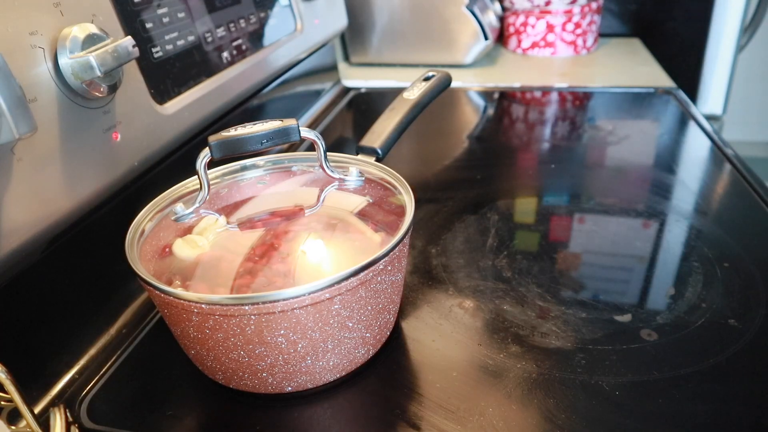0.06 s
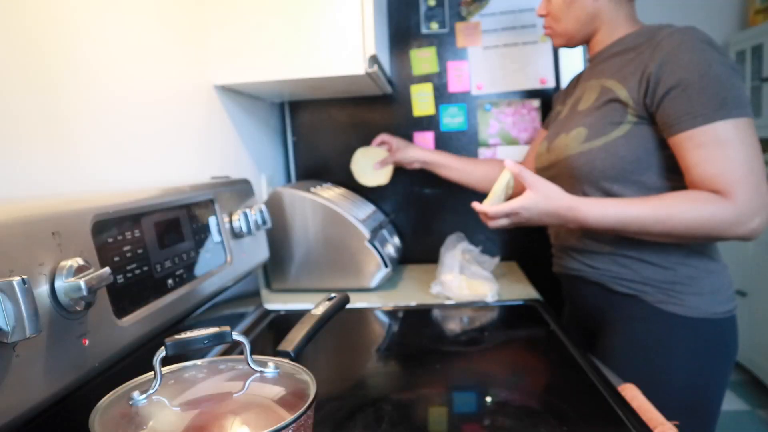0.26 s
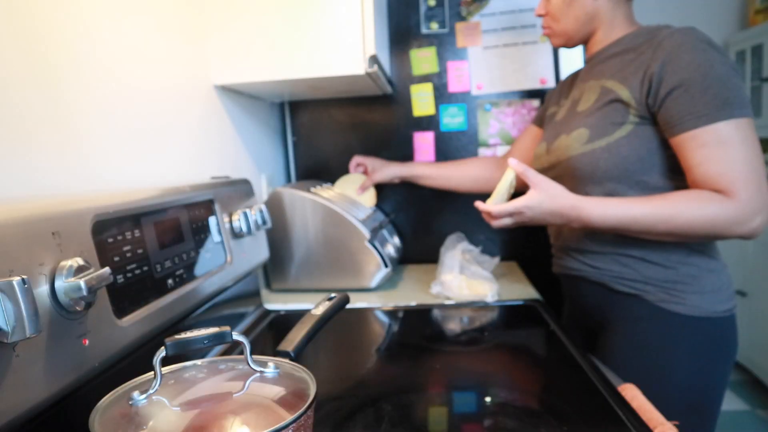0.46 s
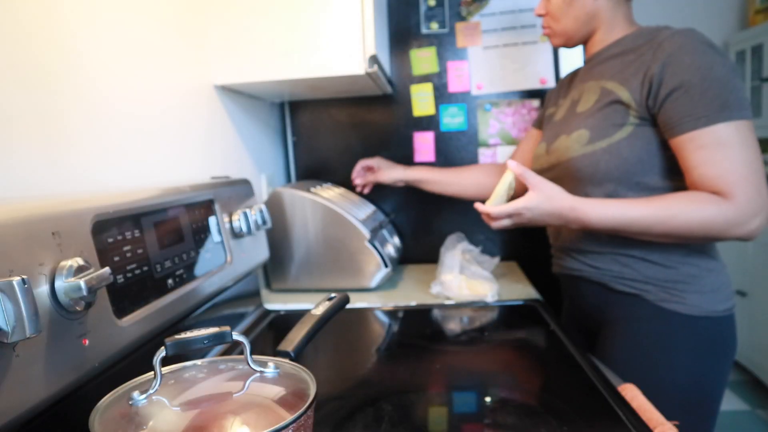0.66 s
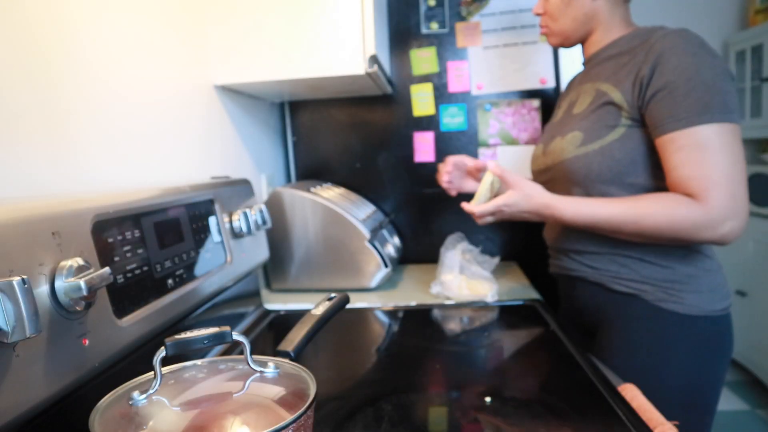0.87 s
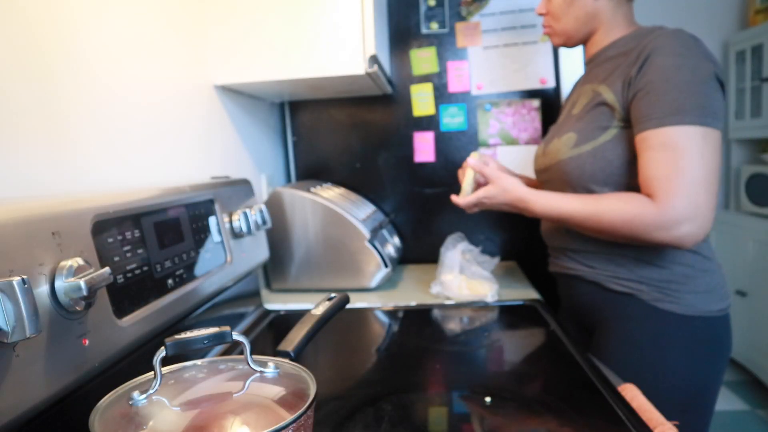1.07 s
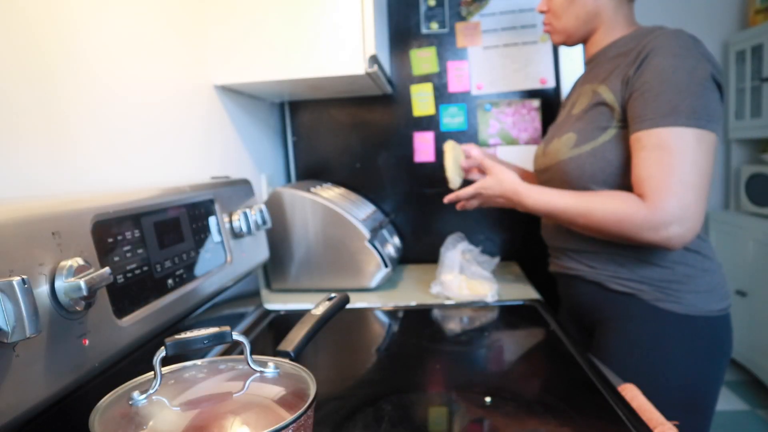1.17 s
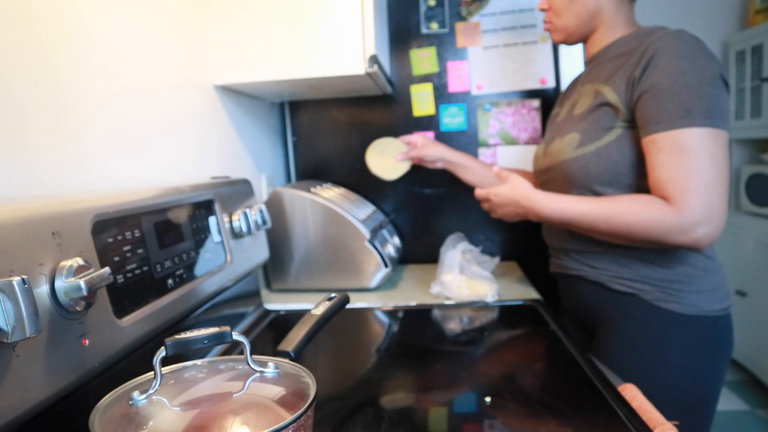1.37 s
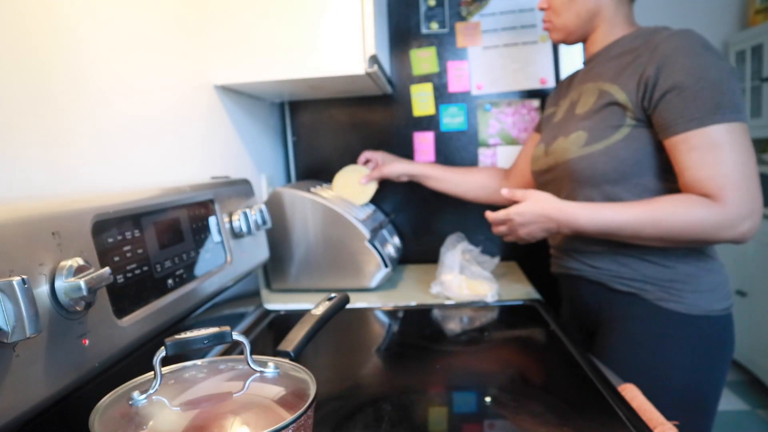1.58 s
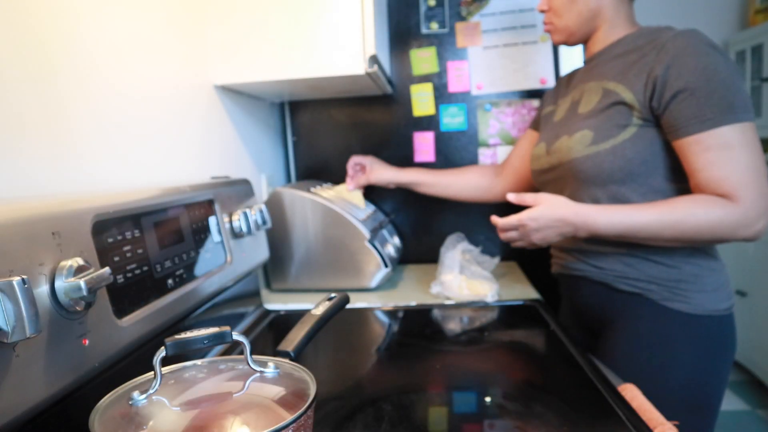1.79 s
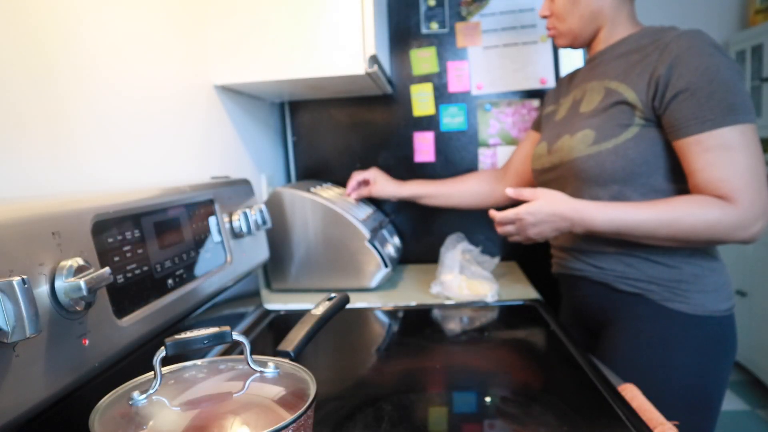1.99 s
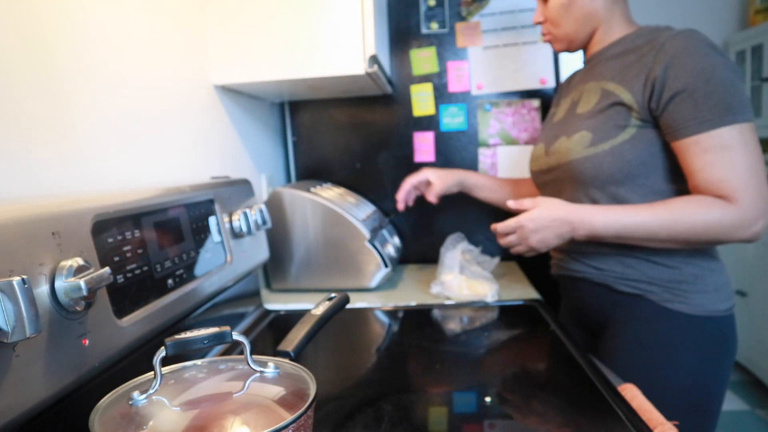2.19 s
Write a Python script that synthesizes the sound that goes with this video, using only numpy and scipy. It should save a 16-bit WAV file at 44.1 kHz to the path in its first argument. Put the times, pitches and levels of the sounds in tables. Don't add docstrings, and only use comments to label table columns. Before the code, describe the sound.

Dry crust scrapes a toaster slot and bumps its thin shell, a pause with tiny ticks follows, then a second scrape ends in a hard metallic knock, over soft steady hum in a hard-walled kitchen.

```python
import sys
import numpy as np
from scipy import signal
from scipy.fft import rfft, irfft, next_fast_len
from scipy.io import wavfile
from scipy.ndimage import map_coordinates

SR = 44100
rng = np.random.default_rng(int(sys.argv[2]) if len(sys.argv) > 2 else 0)


def bounce(signal):
    frames = np.transpose(np.atleast_2d(signal))
    limited = np.clip(frames, -1, 1)
    pcm = np.round(limited * 32767).astype(np.int16)
    wavfile.write(sys.argv[1], SR, pcm)


def gain_from_db(level_db):
    decades = np.asarray(level_db, float) / 20
    return 10 ** decades


N = 98916
RISE_S = 0.0019


def unit(x):
    return x / np.sqrt(np.mean(x ** 2) + 1e-20)


def along(points, hz):
    f, v = np.transpose(points)
    return np.interp(np.log(hz + 1), np.log(f + 1), v)


def wobble(rate):
    return map_coordinates(rng.standard_normal(int(N * rate / SR) + 4), [np.arange(N) * rate / SR])


def filtered(x, response):
    m = next_fast_len(x.shape[-1] + 8192)
    spectrum = rfft(x, m) * response(np.fft.rfftfreq(m, 1 / SR))
    return irfft(spectrum, m)[..., :x.shape[-1]]


def peak(f, hz, width):
    return 1j * f * width / (hz * hz - f * f + 1j * f * width)


def rising(t, rise_s):
    return 1 - np.exp(-t / rise_s)


def ports(pair):
    # (frequency [Hz], side minus middle [dB])
    width = [(60, -37), (130, -21), (290, -16), (640, -9), (1400, -7.5), (3070, 0.5), (6750, 2),
             (14800, 8.5)]

    def middle_and_side(hz):
        turn = np.arctan(gain_from_db(along(width, hz)))
        return np.array([np.cos(turn), np.sin(turn)])

    mid, side = filtered(pair, middle_and_side)
    return np.array([mid + side, mid - side])


def hum():
    # (frequency [Hz], level [dB per Hz])
    air_color = [(15, -26), (25, -19.5), (87, -6.5), (168, -10.5), (264, -6.5), (392, -13.5), (569, -12),
                 (6000, -33.5), (14000, -49.5)]
    # (frequency [Hz], width [Hz], level [dB rms])
    housing = [(61, 12, -66.5), (92.1, 17, -62.5), (126.8, 23, -66), (210.5, 11.8, -62), (245.3, 31, -57.5),
               (278.5, 10.5, -63.5), (513, 46, -65), (585.7, 19, -69.5), (713.3, 14.6, -68),
               (961, 13.4, -72.5), (1467, 167, -70), (2028.6, 38, -70), (3396, 94, -77.5)]
    # (time [s], level [dB])
    swell = [(0, -1), (.4, -1.5), (.65, 0.5), (1, 0), (1.25, -1.5), (1.45, -0.5), (1.7, -0.5), (2, 2),
             (2.24, -1.5)]
    air_db = -53
    sound = gain_from_db(air_db) * unit(filtered(rng.standard_normal((2, N)), lambda f: gain_from_db(along(air_color, f))))
    for hz, width, db in housing:
        noise = rng.standard_normal((2, N))
        drone = unit(filtered(noise, lambda f: peak(f, hz, width) ** 2))
        sound = sound + gain_from_db(db + 1.64 * wobble(6.32)) * drone
    s, db = np.transpose(swell)
    load_db = np.interp(np.arange(N) / SR, s, db) + 0.6 * wobble(4.96)
    return ports(gain_from_db(load_db) * sound)


def motor():
    # (frequency [Hz], level [dB rms])
    notes_hum = [(91.7, -62), (283.9, -61.5), (238.3, -62.5)]
    drift_hz = 1.64
    out = np.zeros(N)
    for hz, db in notes_hum:
        phase = 2 * np.pi * np.cumsum(hz + drift_hz * wobble(9.74)) / SR
        out += gain_from_db(db + 4 + 3.6 * wobble(8.22)) * np.sin(phase)
    return out


def ticks():
    # (time [s], peak level [dB], centre [Hz], width [Hz], time to fall 60 dB [s])
    crumbs = [(0.2557, -53, 8500, 7000, 0.037), (.345, -57, 8900, 6000, 0.025),
              (0.838, -52.5, 9600, 5030, 0.061), (.91, -57.5, 9200, 5000, 0.043),
              (1.002, -57.5, 9000, 6000, 0.053), (1.125, -60.5, 8900, 5000, 0.028),
              (1.289, -53.5, 10300, 6000, 0.047), (1.2902, -48.5, 3080, 2500, 0.036),
              (1.296, -50.5, 5200, 3000, 0.02), (1.373, -43.5, 2700, 1000, 0.043),
              (1.379, -52.5, 3020, 600, 0.04), (1.4485, -53.5, 9900, 4950, 0.028),
              (1.452, -51.5, 3700, 2200, 0.049), (1.604, -58.5, 9100, 5000, .03)]
    n = SR // 8
    out, t = np.zeros((2, N + n)), np.arange(n) / SR
    for s, db, hz, width, t60 in crumbs:
        snap = unit(filtered(rng.standard_normal((2, n)), lambda f: peak(f, hz, width) ** 2))
        start = round(s * SR)
        out[:, start:start + n] += gain_from_db(db - 1 - 60 * t / t60) * rising(t, 0.00068) * snap
    return out[:, :N]


def rasps():
    # (time [s], peak level [dB], brightness [dB], time to fall 60 dB [s], edge pitch [Hz])
    scrapes = [(.594, -49.5, -4, 0.14, 2520), (.612, -46.5, -15, 0.18, 2360), (.627, -44.5, -3, 0.14, 3500),
               (.642, -44, -11, 0.094, 3660), (.66, -47, -12, 0.085, 2970), (.684, -38.5, -5, 0.085, 2700),
               (.7, -42.5, -4.5, 0.13, 2800), (.723, -38.5, -3, 0.085, 3800),
               (.735, -40.5, -8.5, 0.12, 2200), (.784, -48, -18, 0.13, 2600),
               (1.778, -45.5, -5, 0.076, 4330), (1.807, -43.5, -20, 0.093, 2400),
               (1.836, -39, -1.5, 0.071, 4060), (1.87, -47, -5, 0.054, 3300),
               (1.888, -29.5, 0.5, 0.056, 2700), (1.8905, -27.5, -3.5, 0.074, 3130),
               (1.896, -30.5, -9.5, 0.14, 1714), (1.935, -42.5, -3, 0.18, 3500),
               (1.976, -41, 1, 0.11, 4240), (2.076, -44.5, -5.5, 0.081, 2700),
               (2.082, -46.5, -8, .07, 4440), (2.109, -50, -12, 0.16, 2700),
               (2.168, -50.5, -26, 0.07, 2460)]
    # (frequency [Hz], level [dB])
    crust = [(500, -2), (1000, 1), (2500, -5), (4500, -9.5), (6000, -8), (8000, -30)]
    # (frequency [Hz], level [dB])
    flakes = [(5500, -8), (7500, -6), (9000, -2), (11500, -13), (13000, -8), (15000, -28)]
    # (frequency [Hz], width [Hz], lift [dB])
    slot = [(2270, 83, -15.5), (2700, 200, -5.5), (3500, 630, -7), (4350, 480, -2), (8280, 550, -7.5),
            (9630, 430, -10), (10720, 1100, -1.5)]
    rasp_db, edge_q, edge_db = -4.5, 3, 9
    n = SR // 4
    out, t = np.zeros((2, N + n)), np.arange(n) / SR

    def wires(f):
        return 1 + sum(gain_from_db(db) * abs(peak(f, hz, width)) ** 2 for hz, width, db in slot)

    for s, db, bright_db, t60, edge_hz in scrapes:
        def crust_on_edge(f):
            edge = 1 + gain_from_db(edge_db) * abs(peak(f, edge_hz, edge_hz / edge_q)) ** 2
            return gain_from_db(along(crust, f)) * wires(f) * edge

        low_noise, high_noise = rng.standard_normal((2, 2, n))
        low = unit(filtered(low_noise, crust_on_edge))
        high = unit(filtered(high_noise, lambda f: gain_from_db(along(flakes, f)) * wires(f)))
        shape = rising(t, RISE_S) * gain_from_db(db + rasp_db - 60 * t / t60)
        start = round(s * SR)
        out[:, start:start + n] += shape * (low + gain_from_db(bright_db) * high)
    return out[:, :N]


def knocks():
    # (time [s], level [dB], softness
    # [Hz])
    bread_hits = [
        (1.89705, -40, 2500),
        (1.9005, -35, 2500),
        (1.91065, -36, 2500),
        (1.9192, -41, 900),
                  (.632, -59, 1500),
        (.652, -46.5, 1500),
        (.688, -51, 1500),
        (.703, -44, 1200),
        (.726, -46, 2480),
        (.734, -44.5, 2500),
        (.752, -49, 1500),
        (.765, -56, 1200),
        (1.82, -43.5, 900),
        (1.93, -40.5, 1000),
    ]
    # (frequency [Hz], level [dB], time to fall 60 dB [s])
    shell = [(210, -3, .3), (382, -11, .3), (505, -8, .15), (585, -.5, .17), (706, -5, .17),
             (790, -10, .12), (1090, -6, .12), (1170, -7, .12), (1310, -7, .12), (1403, -9, .12),
             (1682, 3, .11), (2230, -11, .1), (3110, -10, .06), (4200, -7, .06)]
    shell_damp, scatter_db, shell_db = 0.45, 2, 0.5
    out, t = np.zeros(N + SR), np.arange(SR // 3) / SR
    for s, db, soft_hz in bread_hits:
        ring = np.zeros(len(t))
        for hz, level, t60 in shell:
            luck_db = scatter_db * rng.standard_normal()
            fade = gain_from_db(level + luck_db - 60 * t / (shell_damp * t60))
            ring += fade / (1 + (hz / soft_hz) ** 2) * np.sin(2 * np.pi * hz * t)
        start = round(s * SR)
        out[start:start + len(t)] += gain_from_db(db + shell_db) * ring * rising(t, 0.00035)
    return out[:N]


def thumps():
    # (time [s], level [dB], frequency [Hz], time to fall 60 dB [s])
    pushes = [
        (0.734, -39, 113, 0.093),
        (2.051, -51, 69, 0.17),
    ]
    out = np.zeros(N)
    for s, db, hz, t60 in pushes:
        t = np.clip(np.arange(N) / SR - s, 0, None)
        out += gain_from_db(db - 60 * t / t60) * rising(t, RISE_S) * np.sin(2 * np.pi * hz * t)
    return out


def kitchen(x):
    # (frequency [Hz], time to fall 60 dB [s])
    echo = [(200, 0.47), (2000, 0.38), (8000, 0.48), (14000, 0.18)]
    hz, t, z = signal.stft(rng.standard_normal((2, SR // 2)), SR, nperseg=256)
    fading = z * gain_from_db(-60 * t / along(echo, hz)[:, None])
    tail = signal.istft(fading, SR, nperseg=256)[1]
    late = np.pad(x, (200, 0))[None]
    return signal.fftconvolve(late, tail / np.linalg.norm(tail[0]), axes=1)[:, :N]


def scene():
    spread_db, wet_db, shell_wet_db = -10.5, -3.5, -8.5
    background = hum() + motor()
    crisp = ticks() + rasps()
    knock = knocks() + thumps()
    near = ports(crisp * gain_from_db([[0], [spread_db]])) * gain_from_db([[-.4], [.4]]) + knock
    answer = ports(kitchen(crisp[0] + gain_from_db(shell_wet_db) * knock))
    return background + near + gain_from_db(wet_db) * answer


def roll_off(x):
    return signal.sosfilt(signal.butter(12, 15430, fs=SR, output="sos"), x)


def record(dry):
    # (frequency [Hz], level [dB])
    mic = [(9000, 0.5), (11500, 3.5), (12800, 0), (14000, -3), (15500, -1)]
    start_s, fade_s = 0.1584, 0.0022
    heard = filtered(dry, lambda f: gain_from_db(along(mic, f)))
    cut_in = np.clip((np.arange(N) / SR - start_s) / fade_s, 0, 1)
    return roll_off(heard * cut_in)


dry = scene()
out = record(dry)
bounce(out)
```